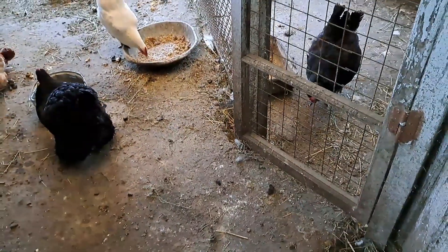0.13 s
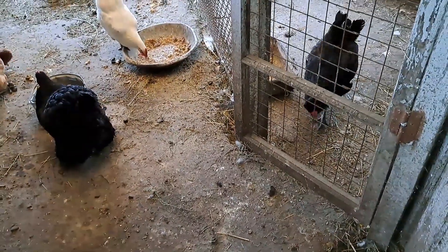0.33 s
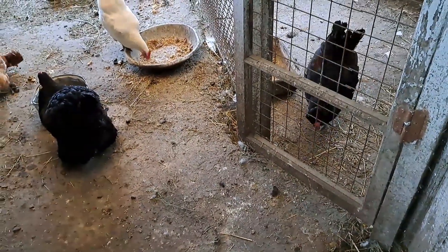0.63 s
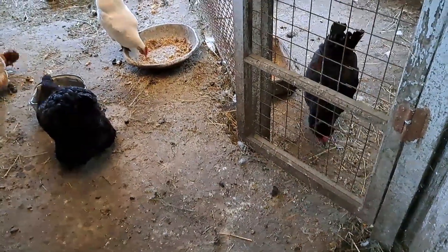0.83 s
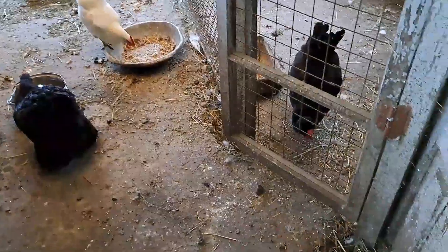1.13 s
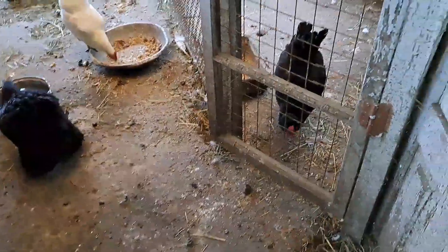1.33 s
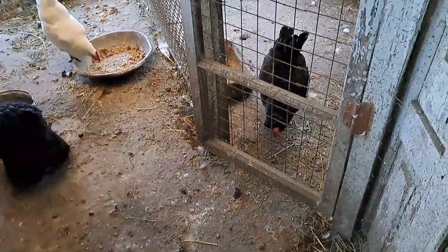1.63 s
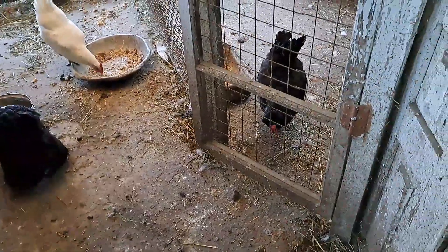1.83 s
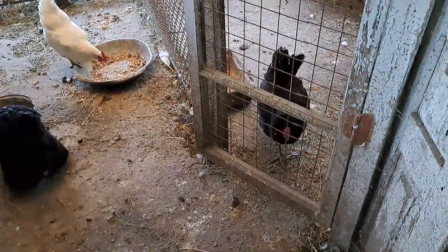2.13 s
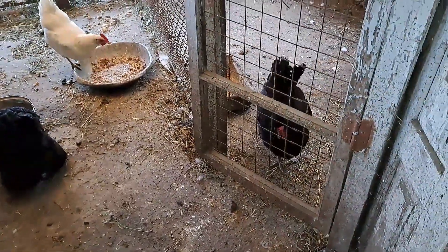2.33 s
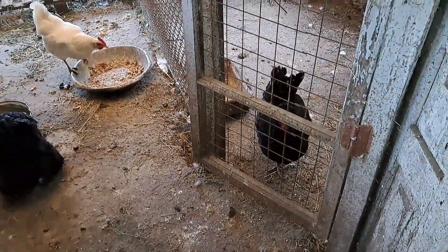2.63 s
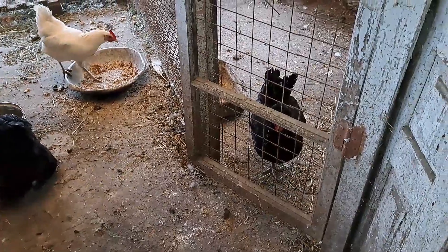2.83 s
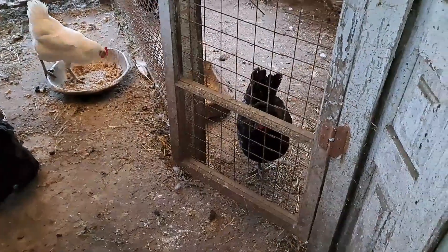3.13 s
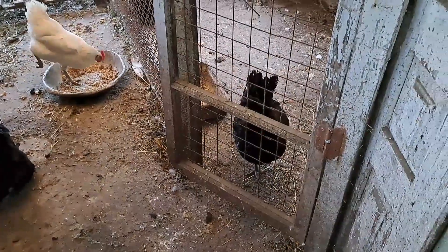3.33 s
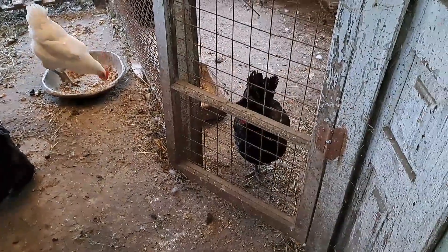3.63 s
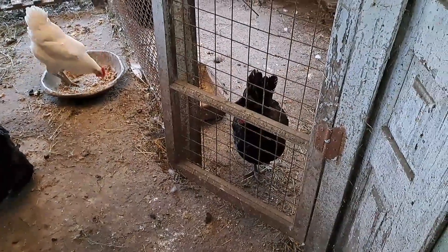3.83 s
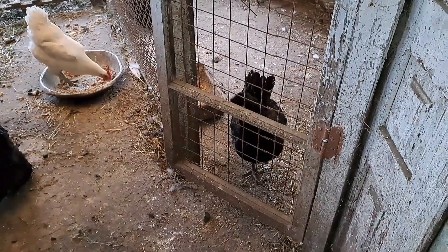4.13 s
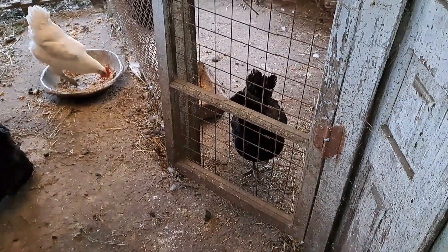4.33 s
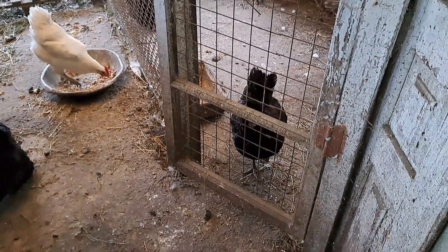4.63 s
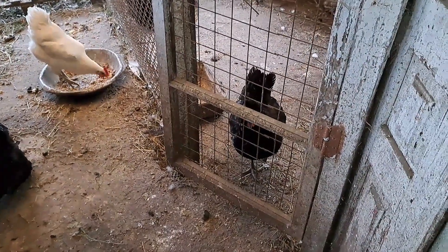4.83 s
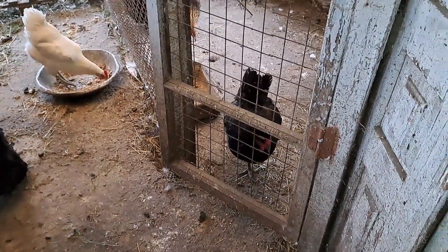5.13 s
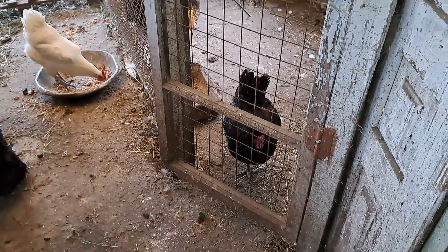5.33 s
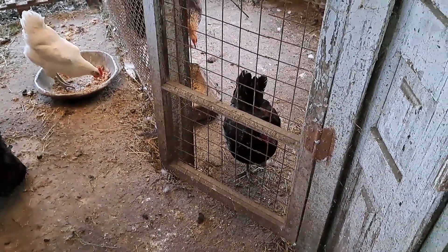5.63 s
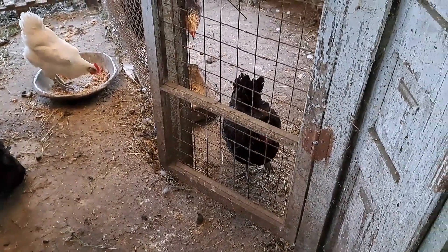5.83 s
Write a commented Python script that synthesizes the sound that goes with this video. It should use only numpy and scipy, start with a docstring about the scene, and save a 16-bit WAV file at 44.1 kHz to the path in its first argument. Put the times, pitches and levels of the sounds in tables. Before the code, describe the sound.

A hen squawks hoarsely and shrieks twice amid flapping wings, then hens cluck steadily while beaks tap a metal feed bowl.

```python
"""A hen in a poultry shed lets out two hoarse squawks, a growling note with rasp, and two cracking shrieks.
A wing scuffle of noise gusts goes with them. Then pulsed throat resonances cluck low and steadily, another
hen answers with sharper yelps, and wavering harmonic tones whine and moan farther off.
Beaks tap the metal feed bowl (struck modes); runs of ticks make rough scuffs and faint rustles; filtered
noise makes the yard air, a faint steady hiss and soft bumps on the hand-held microphone."""
import sys
import numpy as np
from scipy import signal
from scipy.fft import rfft, irfft
from scipy.io import wavfile

SR = 44100
rng = np.random.default_rng(int(sys.argv[2]) if len(sys.argv) > 2 else 0)


def put_to_file(sound):
    """Save the sound as 16-bit audio at rate SR, in the file named by the first command-line argument."""
    columns = np.atleast_2d(sound).T  # one column per channel
    safe = np.clip(columns, -1, 1)
    whole_steps = np.round(safe * 32767)
    wavfile.write(sys.argv[1], SR, whole_steps.astype(np.int16))


N = 263718
TIME = np.arange(N) / SR


def gain_of(db):
    """Decibels to gain."""
    return 10 ** (np.asarray(db) / 20)


def evened(x):
    """Scales to rms 1."""
    return x / np.sqrt(np.mean(x ** 2) + 1e-20)


def read(points, hz):
    """Reads a table on a log-frequency axis."""
    f, value = np.transpose(points)
    return np.interp(np.log(hz + 1), np.log(f + 1), value)


def level(s, db):
    """Gain curve through dB points, silent outside them."""
    return gain_of(np.interp(TIME, s, db, left=-120, right=-120))


def add(mix, s, sound):
    """Mixes a sound in at time s."""
    part = mix[max(round(s * SR), 0):][:len(sound)]
    part += sound[:len(part)]


def waver(n, hz):
    """Smooth random curve of rms 1, rolled off above hz."""
    f = np.fft.rfftfreq(n, 1 / SR)
    return evened(irfft(rfft(rng.standard_normal(n)) / (1 + (f / hz) ** 4), n))


def colour(x, points, shift=1, size=4096):
    """Causal minimum-phase filter with the given spectrum, its resonances scaled by shift."""
    hz = abs(np.fft.fftfreq(size, 1 / SR)) / shift
    log_gain = np.log(gain_of(read(points, hz)))
    taps = np.fft.ifft(np.exp(np.conj(signal.hilbert(log_gain)))).real
    return signal.fftconvolve(x, taps[:size // 2])[:len(x)]


def hiss(points, same):
    """Coloured noise on two partly alike channels."""
    a, b = (evened(colour(rng.standard_normal(N), points)) for _ in range(2))
    same = np.clip(same, 0, 1)
    return np.array([a, same * a + np.sqrt(1 - same ** 2) * b])


def place(x, ports, wet_db, early=3.8, early_s=0.0031, treble_db=5):
    """Puts a source in the shed: direct sound at two ports, early echoes off the walls and a short tail."""
    # decay time of the shed: (frequency [Hz], T60 [s])
    shed_t60 = [(150, .3), (700, 0.14), (2000, 0.17), (5000, 0.1), (14000, 0.035)]
    # likeness of the echoes at the two ports: (frequency [Hz], correlation [-1 to 1])
    echo_likeness = [(250, 0.92), (600, 0.14), (1000, -0.18), (1500, 0.0065), (3000, 0.19)]
    late_db, late_t60_s = -29.5, 1  # faint lingering late tail, relative to the shed's

    bins = np.fft.rfftfreq(N, 1 / SR)
    balance_db, lead_rad = (read(np.array(ports)[:, [0, k]], bins) for k in (1, 2))
    half = gain_of(balance_db / 2) * np.exp(1j * lead_rad / 2)
    direct = irfft(rfft(x) * np.array([half, 1 / half]), N)

    t = np.arange(SR // 2) / SR
    present = (rng.random((2, len(t))) < 2500 / SR) * (t > .004)
    taps = rng.choice([-1., 1.], (2, len(t))) * present
    hz, at, z = signal.stft(taps * (1 + early * np.exp(-t / early_s)), SR, nperseg=256)
    same = np.clip(read(echo_likeness, hz), -1, 1)[:, None]
    z = np.array([z[0], same * z[0] + np.sqrt(1 - same ** 2) * z[1]])
    decay = gain_of(-60 * at / read(shed_t60, hz)[:, None])
    late = gain_of(late_db - 60 * at / late_t60_s) / (1 + (hz[:, None] / 2000) ** 2)
    tail = signal.istft(z * (decay + late), SR, nperseg=256)[1]
    tail = tail / np.linalg.norm(tail, axis=1, keepdims=True)

    # treble is scattered more than bass
    thrown = colour(x, [(250, -0.5), (800, 2), (2500, treble_db), (9000, 10)])
    echoes = signal.fftconvolve(thrown[None], tail, axes=1)[:, :N]
    return direct + gain_of(wet_db) * echoes


def handling(rest_db=-68, balance_db=4.2):
    """A faint rumble of the hand-held microphone, swelling into soft bumps."""
    # bumps on the microphone: (time [s], level before port balance [dB], half length scale [s])
    bump_rows = [(0.481, -71, 0.12), (0.845, -38, 0.073), (2.16, -61, 0.028), (2.87, -47, .04),
                 (3.273, -62, 0.084), (3.444, -41.5, 0.044), (4.047, -49, 0.094), (5.321, -38.5, 0.017),
                 (5.571, -43, 0.071), (5.702, -39.5, 0.0099), (5.818, -43, 0.029)]
    # bump spectrum: (frequency [Hz], density [dB per Hz])
    bump_spectrum = [(12, -40), (20, -10), (41, -5.5), (59, 2), (102, -14), (150, -19), (170, -14),
                     (220, -47.5), (370, -120)]

    swell = gain_of(rest_db)
    for s, db, half_s in bump_rows:
        swell = swell + gain_of(db) * np.exp(1 - np.hypot(1, 1.14 * (TIME - s) / half_s))
    return swell * hiss(bump_spectrum, 0.66) * gain_of([[balance_db], [-balance_db]])


def yard(air_db=-65, hiss_db=-70, drift_db=2.5):
    """Low outdoor air noise with a slow drift, and a faint steady hiss."""
    # outdoor air spectrum: (frequency [Hz], density [dB per Hz])
    air_spectrum = [(59, -27.5), (100, -4), (190, -7), (269, 1.5), (734, -9.5), (801, -16.5), (1060, -12),
                    (1500, -20.5), (2000, -21.5), (2600, -39), (4400, -120)]
    # steady hiss spectrum: (frequency [Hz], density [dB per Hz])
    hiss_spectrum = [(900, -24.5), (1400, -2), (2400, -2.5), (4000, -7), (6000, -8.5), (8000, -7),
                     (9500, -10.5), (12000, -5.5), (15500, -20.5)]

    air = gain_of(air_db + drift_db * waver(N, 3)) * hiss(air_spectrum, 0.66)
    return air + gain_of(hiss_db) * hiss(hiss_spectrum, 0.9)


def scuffle(air_db=-43, feather_db=-50, flutter_db=3.0, still_air_db_per_s=70):
    """Feather rustle swells, then settles slowly; each wing beat pushes a gust of air with a swish."""
    # wing air spectrum: (frequency [Hz], density [dB per Hz])
    air_spectrum = [(18, -43.5), (30, -11.5), (102, -13), (146, -10), (231, -6), (269, -0.5), (329, -9),
                    (455, -14), (600, -17.5), (780, -31), (1320, -120)]
    # feather spectrum: (frequency [Hz], density [dB per Hz])
    feather_spectrum = [(350, -37.5), (600, -7.5), (902, -13), (1360, -7.5), (1910, -7.5), (2250, -12),
                        (2950, -17.5), (3710, -15.5), (8180, -21), (15500, -21.5)]
    # wing beats: (time [s], air gust [dB], feather swish before flutter [dB])
    beat_rows = [(.405, -34, -48), (0.505, -32, -40), (0.734, -31, -42.5), (0.854, -20, -47),
                 (.958, -29.5, -47)]
    beat_rise_s, beat_fall_s = 0.015, 0.04
    start_s, rise_s, end_s, settle_db_per_s = 0.047, 0.35, 1.063, 20

    rise = np.clip((TIME - start_s) / rise_s, 0, 1)
    after = np.maximum(TIME - end_s, 0)
    air = rise * gain_of(air_db - still_air_db_per_s * after)
    swish = rise * gain_of(feather_db - settle_db_per_s * after)
    for s, gust_db, swish_db in beat_rows:
        beat = np.exp(-np.maximum((s - TIME) / beat_rise_s, (TIME - s) / beat_fall_s))
        air = air + gain_of(gust_db) * beat
        swish = swish + gain_of(swish_db) * beat
    flutter = gain_of(flutter_db * waver(N, 30))
    return air * hiss(air_spectrum, .97) + swish * flutter * hiss(feather_spectrum, 0.15)


def scuffs(ticks_per_s=900, spread_db=4, grit_db=-6, attack_s=0.0017, fade_db=6, release_s=0.0059):
    """Rough noisy scrapes, scuffs and faint rustles, each a rapid uneven run of ticks that fades."""
    # a short burst of mid-range noise at the very start, then scrapes, scuffs and rustles:
    # (start [s], length [s], rms level [dB])
    scuff_rows = [(.001, .03, -41.5), (1.66, 0.036, -47.5), (1.817, 0.034, -42.5), (2.906, 0.047, -51.5),
                  (3.548, 0.061, -59), (3.725, 0.037, -50), (3.781, 0.0392, -37.5), (3.827, 0.035, -38.5),
                  (5.05, .05, -59), (5.465, 0.061, -56)]
    # scuff spectrum: (frequency [Hz], density [dB per Hz])
    scuff_spectrum = [(150, -30), (400, 1.5), (700, -1), (1200, 0), (2000, -7), (3000, -17.5), (3600, -20),
                      (4600, -27.5), (6000, -32.5), (9000, -26.5), (12000, -35), (15500, -37)]

    out, t = np.zeros(N), np.arange(SR // 8) / SR
    for s, length_s, db in scuff_rows:
        present = rng.random(len(t)) < ticks_per_s / SR
        ticks = evened(present * gain_of(spread_db * rng.standard_normal(len(t))))
        grit = gain_of(grit_db) * rng.standard_normal(len(t))
        envelope = np.minimum(t / attack_s, 1) * gain_of(-fade_db * t / length_s)
        envelope = envelope * np.exp(-np.maximum(t - length_s, 0) / release_s)
        run = colour((ticks + grit) * envelope, scuff_spectrum)
        add(out, s, gain_of(db) * run / run[t < length_s].std())
    return out


def pecks(ring_db=-4, scatter_db=-12, tap_db=1, ring_t60_s=0.05):
    """The beak strikes, grains skitter after it, and the bowl rings briefly under the feed."""
    # beak taps: (time [s], peak relative to tap_db [dB], treble tilt [dB], skitter decay [s])
    peck_rows = [(2.1858, -69, 14, 0.0083), (2.395, -37.5, 3, 0.01), (3.7856, -36.5, -24, 0.011),
                 (3.8346, -40, -22, .006), (4.2848, -15.5, -6.5, 0.017), (4.817, -25, -26.5, 0.015),
                 (5.0618, -47.5, -11.5, 0.014), (5.2782, -27.5, -13.5, 0.018), (5.6392, -17.5, -7.5, 0.011),
                 (5.8754, -35.5, 10, 0.072), (5.9027, -31, -5, 0.032)]
    # bowl modes, damped by the feed: (nominal frequency [Hz], relative level [dB])
    bowl_modes = [(1130, 13), (1580, 6.5), (1840, 5.5), (2374, -0.5), (3160, -0.5), (3964, -0.5),
                  (5100, -26), (8100, -30)]
    # tap spectrum: (frequency [Hz], density [dB per Hz])
    tap_spectrum = [(290, -32), (500, -38), (726, -16.5), (1400, -5.5), (2040, -1.5), (2930, -10),
                    (3960, -9.5), (5200, -9), (6300, -21), (7670, -15), (9240, -29), (11100, -22),
                    (15500, -35)]

    out, t = np.zeros(N), np.arange(SR // 4) / SR
    for s, db, treble_db, skitter_s in peck_rows:
        grains = rng.standard_normal(len(t)) * (rng.random(len(t)) < 2500 / SR)
        blow = (t == 0) + gain_of(scatter_db) * grains * np.exp(-t / skitter_s)
        # each peck's ring pitches are varied at random by up to 5 percent
        detune = rng.uniform(.95, 1.05, len(bowl_modes))
        ring = sum(gain_of(d - 60 * t / ring_t60_s) * np.sin(2 * np.pi * f * k * t)
                   for (f, d), k in zip(bowl_modes, detune))
        tap = evened(colour(blow, tap_spectrum)) + gain_of(ring_db) * evened(ring)
        tap = colour(tap, [(2800, 0), (6000, treble_db)])
        add(out, s, gain_of(db + tap_db) * tap / abs(tap).max())
    return out


def held_voice(rows, overtones_db, jitter):
    """A held harmonic voice with unsteady pitch; overtones are (multiple, dB)."""
    s, hz, db = np.transpose(rows)
    phase = 2 * np.pi * np.cumsum(np.interp(TIME, s, hz) * (1 + jitter * waver(N, 110))) / SR
    fade = np.clip(np.minimum(TIME - s[0], s[-1] - TIME) / 0.0033, 0, 1)
    return fade * level(s, db) * sum(gain_of(d) * np.sin(k * phase) for k, d in overtones_db)


def far_hens(whine_db=-2, moan_db=-3):
    """A thin held whine and a low, shaky falling moan, each with a wavering level."""
    # whining hen: (time [s], mean pitch [Hz], level relative to whine_db [dB])
    whine_curve = [(1.27, 880, -50), (1.32, 1050, -45), (1.41, 1079, -45), (1.52, 1045, -38.5),
                   (1.62, 1044, -46), (1.68, 997, -48.5)]
    # low moan: (time [s], mean pitch [Hz], level relative to moan_db [dB])
    moan_curve = [(1.24, 630, -46.5), (1.36, 686, -50), (1.51, 538.3, -50), (1.7, 436, -44.5),
                  (1.76, 415.3, -39.5), (1.9, 400, -72)]

    thin = held_voice(whine_curve, [(1, 0), (2, -27), (3, -30)], jitter=.016)
    thin = thin * gain_of(1.2 * waver(N, 40))
    low = held_voice(moan_curve, [(1, 0), (2, -5), (3, -17), (4, -21), (5, -22)], jitter=.065)
    low = low * gain_of(4 * waver(N, 50))
    return gain_of(whine_db) * thin + gain_of(moan_db) * low


def syllables(rows, throat, top, throat_hz, pulse_hz, jitter, breath, body_db, top_db, attack_s, grunt_db):
    """Each syllable is a soft grunt, then a short burst of uneven pulses as the throat opens."""
    grunt_db_per_doubling, typical_half_s = 14, 0.0096  # longer syllables lead in with a stronger grunt
    puff_share = .3  # decay constant of an air puff, as a share of a cycle

    out, t = np.zeros(N), np.arange(-SR // 16, SR // 8) / SR
    for s, db, lead_s, half_s, hz, treble_db in rows:
        lead_db = min(grunt_db + grunt_db_per_doubling * np.log2(half_s / typical_half_s), -2)
        opening = np.clip((t + half_s + 0.0065) / attack_s, 0, 1)
        burst = opening * np.exp(-((t + 0.0016) / half_s) ** 2 / 2)
        grunt = gain_of(lead_db) * np.clip((t + lead_s) / 0.0056, 0, 1) * np.clip(-t / 0.024, 0, 1)

        rate_hz = pulse_hz * (1 + .2 * burst + jitter * waver(len(t), 130))
        turns = np.cumsum(rate_hz) / SR
        turns -= np.interp(-.002, t, turns)  # a pulse falls 2 ms ahead of the peak
        pulses = evened(np.diff(np.floor(turns), prepend=np.floor(turns[0])))
        puffs = evened(np.exp(-(turns % 1) / puff_share) * rng.standard_normal(len(t)))
        drive = pulses + breath * puffs

        # the throat rings lower while the beak is still shut
        shift = hz / throat_hz
        body = colour(drive * burst, throat, shift) + colour(drive * grunt, throat, .88 * shift)
        edge = colour((.5 * pulses + puffs) * (burst + .5 * grunt), top)
        peak = abs(t) < half_s + .002
        sound = gain_of(body_db) * body / body[peak].std()
        sound = sound + gain_of(treble_db + top_db) * edge / edge[peak].std()
        add(out, s + t[0], gain_of(db) * sound)
    return out


def yelps():
    """Open-beak yelps: a fast, breathy pulse train through a higher throat."""
    # yelps: (peak time [s], level before body and top trims [dB], lead-in [s], half length scale [s],
    # throat resonance [Hz], treble relative to top_db [dB])
    yelp_rows = [(.656, -29, 0.01, 0.0085, 1038, -16), (1.182, -23, 0.068, 0.0057, 1173, -16.5),
                 (1.698, -29.5, 0.12, .009, 1037, -11.5), (2.311, -31.5, 0.035, .008, 940, -18.5),
                 (2.846, -30.5, 0.043, 0.0078, 985, -20), (3.383, -28, 0.0558, .0095, 1017, -14.5),
                 (4.768, -27, 0.0362, 0.0077, 904, -25), (5.584, -24.5, 0.013, 0.00677, 1103, -23)]
    # throat spectrum at throat_hz: (frequency [Hz], density [dB per Hz])
    throat = [(88, -49), (150, -12.5), (258, -7.5), (403, -3), (588, 0.5), (941, 2.5), (1160, 8),
              (1580, -18.5), (1680, -12.5), (1820, -14.5), (2170, -23.5), (2300, -26.5), (2500, -35),
              (3250, -49), (5500, -120)]
    # treble spectrum: (frequency [Hz], density [dB per Hz])
    top = [(1120, -29.5), (1900, 0.5), (2300, -1), (2650, -6.5), (3540, -4.5), (3700, -2), (5360, -15.5),
           (5850, -17), (6550, -20), (8380, -17), (9230, -27.5), (11000, -19), (15500, -32.5)]
    return syllables(yelp_rows, throat, top, throat_hz=976, pulse_hz=263.5, jitter=0.21, breath=1.4,
                     body_db=-1, top_db=-0.5, attack_s=0.01, grunt_db=-10.5)


def clucks():
    """Closed-beak clucks: a slower pulse train through a low throat that lets little treble out."""
    # clucks: (peak time [s], level before body and top trims [dB], lead-in [s], half length scale [s],
    # throat resonance [Hz])
    cluck_rows = [(0.126, -28.5, .036, 0.006, 785), (1.458, -33, 0.034, 0.034, 686),
                  (1.804, -27.5, .04, .008, 828), (2.105, -32, 0.028, 0.0098, 737),
                  (2.436, -26.5, 0.03, .006, 644), (2.697, -26.5, 0.041, 0.015, 655),
                  (2.993, -25.5, 0.039, .0092, 659), (3.341, -28.5, .033, 0.0089, 630),
                  (3.649, -26.5, 0.027, 0.01, 600), (4.248, -32, 0.034, .014, 620),
                  (4.6, -29.5, .031, .0085, 685), (4.897, -27, 0.039, .011, 646),
                  (5.208, -28, 0.033, 0.0094, 640), (5.517, -22.5, 0.035, 0.003, 636),
                  (5.835, -25.5, 0.035, .005, 640)]
    # throat spectrum at throat_hz: (frequency [Hz], density [dB per Hz])
    throat = [(76, -105), (130, -19.5), (215, -7), (328, -6.5), (427, -5), (667, 4.5), (908, -8.5),
              (1010, -19.5), (1200, -14.5), (1470, -39.5), (1610, -26), (2000, -56.5), (2600, -75.5),
              (4400, -120)]
    # treble spectrum: (frequency [Hz], density [dB per Hz])
    top = [(1300, 13), (1900, 1), (2450, 12.5), (2900, -6.5), (3300, 11.5), (4000, -22), (4700, 4.5),
           (6000, -11.5), (9000, -4), (15000, -16)]
    treble_db = -33  # relative to top_db
    return syllables([(*row, treble_db) for row in cluck_rows], throat, top, throat_hz=640, pulse_hz=213.7,
                     jitter=0.24, breath=.4, body_db=-3, top_db=5.0, attack_s=0.011, grunt_db=-3.5)


def voice(note_gain, hz, rough, rasp_gain, throat,
          growl_hz=58, growl=0.77, jitter=.1, breath=1.2, rasp_growl=.55):
    """A nearly pure note with a slow growl beating on it; under strain it breaks into chaos."""
    growl_bend = .1  # pitch swing per unit of roughness, as a share of the pitch
    n, rough = len(hz), np.clip(rough, .001, .95)
    cycle = 2 * np.pi * np.cumsum(growl_hz * (1 + .22 * waver(n, 37))) / SR
    bend = rough * (jitter * waver(n, 200) + growl_bend * np.cos(cycle))
    phase = 2 * np.pi * np.cumsum(hz * (1 + bend)) / SR
    throb = growl * np.sqrt(rough) * np.sin(cycle)

    def line(k, width_hz, chaos):
        """Harmonic k, partly scattered into close sidebands."""
        scatter = waver(n, width_hz) * np.sin(k * phase) + waver(n, width_hz) * np.cos(k * phase)
        return np.sqrt(2 * (1 - chaos ** 2)) * np.sin(k * phase) + chaos * scatter

    overtones = evened(sum(line(k, 300, rough ** .3) for k in range(2, 6)))
    # air escapes the throat in uneven puffs
    puffs = evened((1 + np.cos(phase)) * gain_of(2.5 * waver(n, 250)) * rng.standard_normal(n))
    edge = evened(colour(overtones + (1 + rough) * breath * puffs, throat))
    note = (1 + throb / 2) * line(1, 230, rough ** 1.15)
    return note_gain * note + rasp_gain * (1 + rasp_growl * throb) * edge


def shrieks(upper_jitter=.014):
    """A clear note cracks: the pitch jumps, the rasp flares and a higher voice joins until the release."""
    # shrieks: (start [s], crack [s], base level [dB], clear pitch [Hz], cracked pitch [Hz],
    # mean upper-voice pitch [Hz], base rasp level [dB])
    shriek_rows = [(0.892, 0.923, -5.5, 818.8, 972, 1350, -12),
                   (1.022, 1.056, -10.5, 773, 913.6, 1215, -19.5)]
    # upper-voice harmonics: (multiple, relative level [dB])
    upper_lines = [(1, 3), (2, 6), (3, -16), (4, -16.5), (5, -15)]
    # throat spectrum, scaled with the upper voice: (frequency at throat_hz [Hz], density [dB per Hz])
    throat_points = [(900, -40.5), (1500, -7), (1800, -12), (2150, -4), (2400, -8), (2750, 2), (3100, -3.5),
                     (3500, -14), (4050, -9), (4700, -17), (7000, -10), (9500, -17), (12500, -15),
                     (15500, -19)]
    throat_hz = 1350  # upper-voice pitch at which the throat has that shape
    rise_s, crack_s, hold_s, release_db_per_s = 0.011, .008, 0.021, 597.5
    clear_rough, cracked_rough, crack_drop_db, upper_db = 0.034, .88, -4, -14
    rasp_step_db = -6.5  # counts 1.5 times while clear, half once cracked
    # the note throbs and bends up just before it cracks
    throb_hz, throb_depth_db, throb_lead_s, bend_lead_s = 62, 2, 0.0017, 0.0076

    out, t = np.zeros(N), np.arange(SR // 4) / SR
    for start, crack, db, clear_hz, cracked_hz, upper_hz, rasp_db in shriek_rows:
        since = start + t - crack
        cracked, bend = (.5 + .5 * np.tanh(2 * (since + lead) / crack_s) for lead in (0, bend_lead_s))
        release = gain_of(-release_db_per_s * np.maximum(since - hold_s, 0))
        shape = np.minimum(t / rise_s, 1) * release

        hz = clear_hz + (cracked_hz - clear_hz) * bend
        rough = clear_rough + (cracked_rough - clear_rough) * cracked
        throb_db = throb_depth_db * np.cos(2 * np.pi * throb_hz * (since + throb_lead_s)) * (1 - cracked)
        note_gain = gain_of(db + throb_db + crack_drop_db * cracked)
        rasp_gain = gain_of(rasp_db + rasp_step_db * (1.5 - bend))
        throat = [(f * upper_hz / throat_hz, d) for f, d in throat_points]
        lower = voice(note_gain, hz, rough, rasp_gain, throat)

        phase = 2 * np.pi * np.cumsum(upper_hz * (1 + upper_jitter * waver(len(t), 120))) / SR
        upper = sum(gain_of(d) * np.sin(k * phase) for k, d in upper_lines)
        add(out, start, shape * (lower + cracked * gain_of(db + upper_db) * upper))
    return out


def squawks(voice_db=0, rasp_db=0):
    """Two hoarse drawn-out calls, growling notes with throat rasp, the first rasp thinner."""
    # one curve per squawk: (time [s], effort [dB], mean pitch [Hz], rasp level [dB], roughness [0-1])
    squawk_curves = [
        [(0.2, -41, 1009, -53.5, 0.41), (0.214, -20.5, 1025, -37.5, 0.35), (0.234, -15.5, 1020, -33.5, 0.14),
         (0.26, -26, 963, -39.5, 0.35), (0.3, -20, 907, -34, 0.44), (0.318, -24, 928.6, -33, 0.46),
         (0.358, -18.5, 950, -31.5, 0.47), (0.386, -19, 783.4, -37.5, 0.39), (0.46, -18.5, 749, -40, 0.48),
         (0.53, -48.5, 786, -57, 0.48)],
        [(0.68, -36, 769, -57.5, 0.5), (0.69, -24.5, 761, -54, 0.24), (0.712, -20, 771, -35.5, 0.52),
         (0.83, -16.5, 748, -26.5, 0.52), (0.88, -24.5, 744, -34, 0.52), (0.895, -14, 744, -27, 0.38)],
    ]
    # rasp spectrum of the first call: (frequency [Hz], density [dB per Hz])
    thin_rasp = [(880, -27.5), (1500, -4.5), (1650, -17.5), (1950, -7), (2260, -19), (2640, -11),
                 (3310, -12), (3610, -22), (4310, -14.5), (4940, -23), (8050, -26.5), (9060, -33),
                 (15500, -30)]
    # rasp spectrum of the second call: (frequency [Hz], density [dB per Hz])
    full_rasp = [(880, -43.5), (1500, -4), (1820, -11.5), (2120, 2), (2330, -5.5), (2560, -4), (2950, -4),
                 (3400, -16), (4000, -14), (4700, -14.5), (8290, -19), (9060, -22.5), (12100, -21),
                 (15500, -32.5)]

    out = np.zeros(N)
    for curve, throat in zip(squawk_curves, (thin_rasp, full_rasp)):
        s, *columns = np.transpose(curve)
        t = np.arange(SR // 2) / SR + s[0]
        effort, hz, rasp, rough = (np.interp(t, s, c) for c in columns)
        fade = np.clip(np.minimum(t - s[0], s[-1] - t) / .005, 0, 1)
        call = voice(gain_of(effort + voice_db), hz, rough, gain_of(rasp + rasp_db), throat)
        add(out, s[0], fade * call)
    return out


def scene():
    """All the hens, the bowl, the scuffs and the yard."""
    # squawking hen at the two ports: (frequency [Hz], left minus right [dB], left lead [rad])
    ahead = [(250, .3, 0), (500, 1.5, -.1), (740, -2.8, -.4), (950, -4, .9), (1100, -2, 1.2),
             (1300, 0, -1.5), (2000, 0, -.8), (2700, -2.5, .9), (4000, -2, 1.4), (12000, -1.5, 1.6)]
    # yelping hen, far hens, bowl and scuffs: (frequency [Hz], left minus right [dB], left lead [rad])
    aside = [(250, -1, .1), (600, 0.5, .8), (900, -1.5, 0.27), (1280, -2, 1), (1900, 0, 1),
             (3500, -4.5, 3.6), (12000, -1, 4.8)]
    # clucking hen: (frequency [Hz], left minus right [dB], left lead [rad])
    beside = [(251.3, -0.1, -.05), (637, -1, -.35), (900, -4.5, 0), (1319, -.5, 0.61), (2000, -3, -1.6),
              (3500, -2, -1.8)]

    hens = place(squawks() + shrieks(), ahead, wet_db=-11)
    hens = hens + place(clucks(), beside, wet_db=-9.5)
    hens = hens + place(yelps(), aside, wet_db=-6.5)
    hens = hens + place(far_hens(), aside, wet_db=0.5)
    taps_and_scuffs = place(pecks() + scuffs(), aside, wet_db=-8.0)
    return hens + taps_and_scuffs + scuffle() + yard() + handling()


def record(dry):
    """The two ports differ in the treble; the loudest crests flatten; then the band limit."""
    # treble balance of the ports: (frequency [Hz], left minus right [dB])
    port_balance = [(5500, -0.5), (8200, -4), (12300, 6), (15500, -1.5)]
    edge_hz, ceiling = 15750, 1.05
    half = gain_of(read(port_balance, np.fft.rfftfreq(N, 1 / SR)) / 2)
    ported = irfft(rfft(dry) * np.array([half, 1 / half]), N)
    flat = ported / (1 + (ported / ceiling) ** 8) ** (1 / 8)
    lowpass = signal.firwin(511, edge_hz, window=("kaiser", 9), fs=SR)
    return signal.oaconvolve(flat, lowpass[None], "same")


dry = scene()
out = record(dry)
put_to_file(out)
```